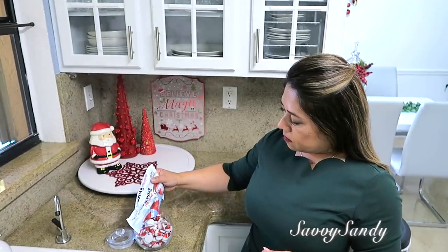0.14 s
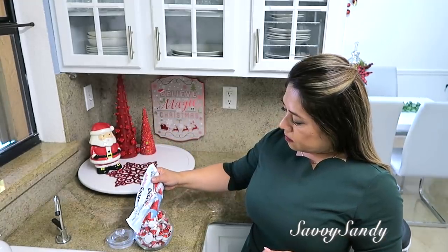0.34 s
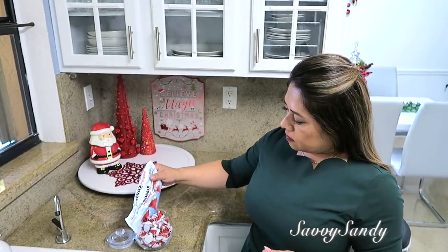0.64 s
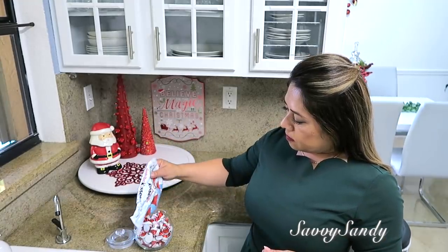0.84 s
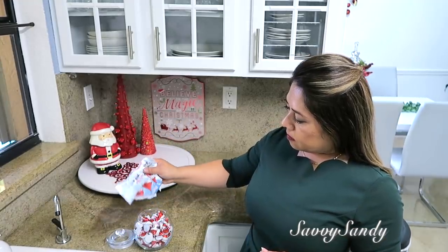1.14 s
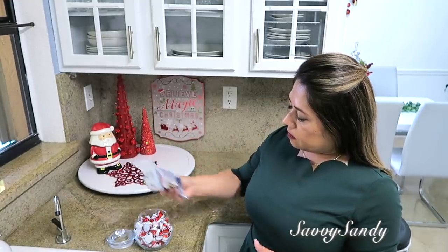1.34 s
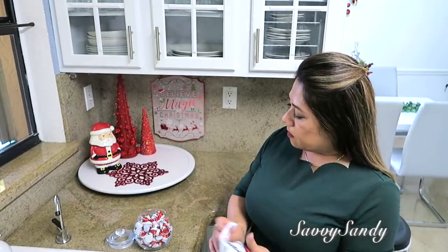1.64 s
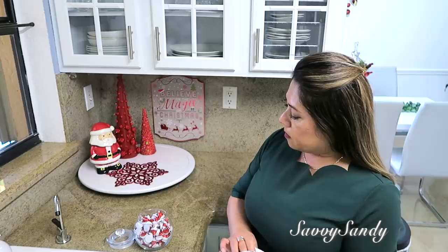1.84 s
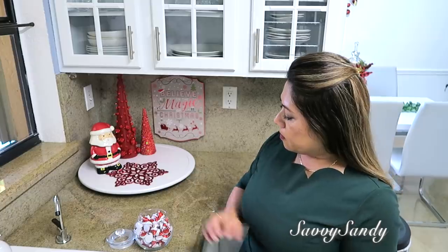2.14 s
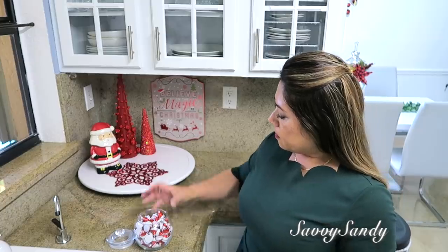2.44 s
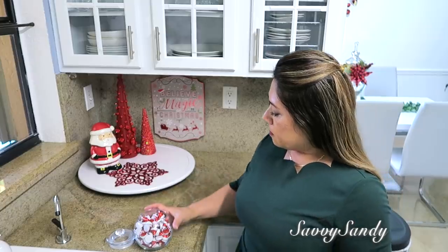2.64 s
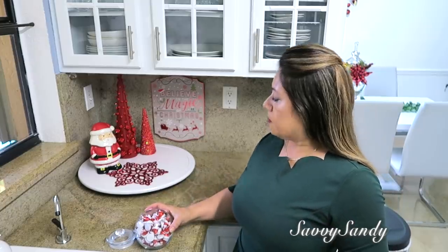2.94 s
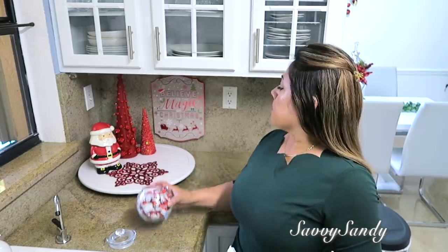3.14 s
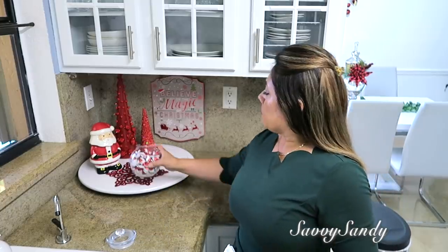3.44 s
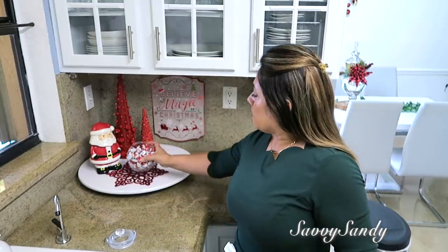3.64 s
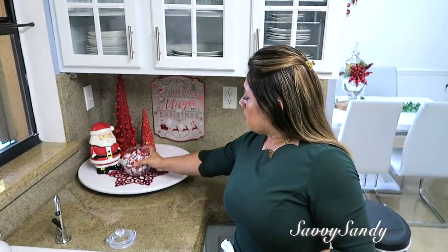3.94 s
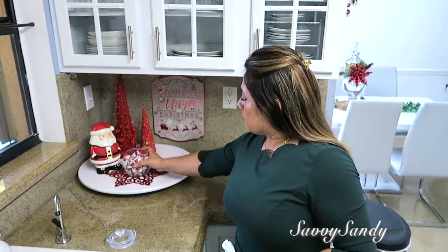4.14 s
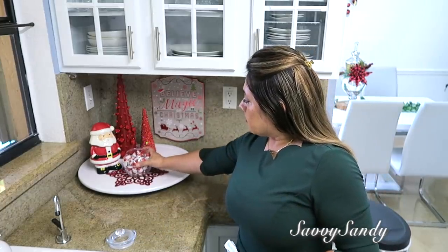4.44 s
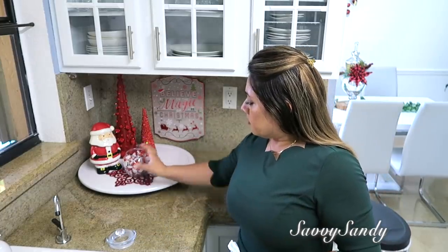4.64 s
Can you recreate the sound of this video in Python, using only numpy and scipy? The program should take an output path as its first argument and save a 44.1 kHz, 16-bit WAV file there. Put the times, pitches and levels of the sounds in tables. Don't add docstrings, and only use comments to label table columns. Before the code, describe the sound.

A reflective domestic kitchen, with a low, slightly wavering fridge hum and soft room air throughout. From the start, foil-wrapped candies tumble from a plastic bag into a glass jar: scattered snaps and faint rustling, with clear glass rings near 0.4 and 0.6 seconds and duller taps around 0.7. At about 0.9 to 1.1 the bag is shaken out in a tight cluster of cracks, then thins. From 1.5 to 2.5 the empty bag is crushed, the loudest and densest passage, with bright, sharp crackles. Between 2.6 and 3.1 fingers touch the jar and candies settle with small ticks, a damped bright glass tap near 2.8 and crisp clicks near 2.95. It goes mostly quiet, with slight taps around 3.7 to 3.9. At 4.16 to 4.19 the jar lands on a wooden tray in a quick, soft double knock. Light taps follow near 4.55 to 4.65. Close, wide stereo, treble-rich sound.

```python
import sys
import numpy as np
from scipy import signal
from scipy.fft import rfft, irfft, next_fast_len
from scipy.io import wavfile

SR = 44100
rng = np.random.default_rng(int(sys.argv[2]) if len(sys.argv) > 2 else 0)


def to_linear_factor(level_db):
    exponent = np.asarray(level_db, float) / 20
    return 10 ** exponent


def digitize_waveform(pressure):
    field = np.atleast_2d(pressure).T
    bounded = np.clip(field, -1, 1)
    quanta = np.round(bounded * 32767).astype(np.int16)
    wavfile.write(sys.argv[1], SR, quanta)


N = 211239


def evened(x):
    return x / np.sqrt(np.mean(x ** 2) + 1e-20)


def read(points, hz):
    f, value = np.transpose(points)
    return np.interp(np.log(hz + 1), np.log(f + 1), value)


def add(mix, s, sound):
    part = mix[round(s * SR):][:len(sound)]
    part += sound[:len(part)]


def colour(x, points):
    size = next_fast_len(N + 4096)
    gain = to_linear_factor(read(points, np.fft.rfftfreq(size, 1 / SR)))
    return irfft(rfft(x, size) * gain, size)[..., :N]


def wander(rate_hz):
    steps = np.arange(0, N + 64, 64)
    r = np.exp(-2 * np.pi * rate_hz * 64 / SR)
    drift = signal.lfilter([1], [1, -2 * r, r * r], rng.standard_normal(len(steps)))
    return np.interp(np.arange(N), steps, evened(drift))


def ring(hz, t60, t):
    return np.sin(2 * np.pi * hz * t) * to_linear_factor(-60 * t / t60)


def snaps():
    # start in seconds, peak in dB, centre in Hz, crispness in dB.
    pour = [(0.005, -28, 2180, -4), (0.028, -24, 2170, -20), (0.08, -45, 1210, -12),
            (0.161, -27.5, 1520, -8), (0.178, -31.5, 700, -3), (0.262, -35, 1900, 3.5),
            (0.269, -23, 1580, 1), (0.279, -36, 1120, -9), (0.305, -28, 1840, -17), (0.338, -31, 515, -30),
            (0.369, -18, 1320, -24), (0.573, -15.5, 2310, -20), (0.67, -23, 1480, -13),
            (0.703, -40, 1400, -15), (0.879, -30.5, 2460, -3), (0.899, -39, 1490, 3.5),
            (0.936, -23, 1570, -58), (0.964, -18, 1860, 0), (0.982, -14.5, 1750, -7), (0.99, -31, 470, -40),
            (1.008, -20.5, 2110, 1), (1.034, -20, 3020, -3.5), (1.075, -36, 2940, 5.5),
            (1.094, -31.5, 2220, 5), (1.123, -39, 1300, -15), (1.22, -29.5, 2000, 1),
            (1.327, -27.5, 1720, -9), (1.377, -36.5, 2520, -3), (1.419, -31, 2360, -7),
            (1.452, -26, 2300, -38)]
    crush = [(1.52, -39, 2070, 5.5), (1.551, -26, 3340, 4.5), (1.618, -27.5, 2300, -24),
             (1.672, -19, 2490, -16), (1.735, -22.5, 2610, -1), (1.74, -18.5, 2420, -13),
             (1.792, -19, 1700, -25), (1.803, -20.5, 1940, 2), (1.805, -26, 12500, -30),
             (1.813, -33, 1730, -10), (1.821, -23, 3200, -2), (1.837, -26, 2600, -14),
             (1.856, -22, 12800, -30), (1.861, -28, 2100, -10), (1.885, -11, 2580, -21),
             (1.903, -26, 2860, 7.5), (1.922, -15.5, 2130, -2), (1.953, -10.5, 2320, -28),
             (1.959, -28, 13000, -30), (1.975, -43, 2390, -18), (2.013, -22, 3160, 2.5),
             (2.044, -20, 3120, -10), (2.069, -23, 2790, -37), (2.075, -22.5, 460, -40),
             (2.097, -16.5, 2220, -3), (2.127, -19, 3600, -14), (2.128, -14.5, 11200, -11),
             (2.171, -15, 2220, -10), (2.183, -22.5, 1960, 5.5), (2.2, -17, 1670, -12),
             (2.204, -33, 540, -40), (2.211, -33, 1530, -3), (2.259, -17, 2730, -33),
             (2.266, -44, 11500, -28), (2.299, -34, 1730, 7.5), (2.343, -28, 2730, 4.5),
             (2.386, -33.5, 2950, 6.5), (2.348, -27.5, 5970, -25), (2.4, -23.5, 2800, -2.5),
             (2.423, -29, 3100, 5.5), (2.5, -45, 910, -18)]
    settle = [(2.641, -25, 2640, -15.5), (2.712, -30.5, 1950, -6), (2.712, -35, 9600, -28),
              (2.722, -34, 2920, -11), (2.793, -26, 1670, -26), (2.837, -25, 715, -43),
              (2.853, -35.5, 780, -45), (2.87, -37, 732, -40), (2.938, -25, 4630, -13),
              (2.941, -31, 6540, -6.5), (2.989, -35, 3036, 4.5), (3.024, -27.5, 1750, 4),
              (3.028, -32.5, 12100, -28), (3.044, -17.5, 3670, -35), (3.052, -25, 1660, -5),
              (3.065, -23, 1660, -3.5), (3.091, -36, 1850, 4), (3.118, -30, 1620, -15),
              (3.253, -54, 12900, -30), (3.34, -49.5, 2970, 3.5), (3.49, -55.5, 2950, 6.5),
              (3.55, -61, 2500, 9), (3.671, -33.5, 3800, -29), (3.775, -30.5, 1460, -1.5),
              (3.861, -32, 3230, -1), (3.985, -51, 9000, -22), (4.159, -43, 2370, -26),
              (4.163, -51, 12500, -30), (4.186, -51, 13100, -33.5), (4.186, -28.5, 2630, -36),
              (4.461, -56, 905, -8), (4.556, -34, 1590, -20), (4.569, -31, 1870, -27),
              (4.63, -27.5, 1370, -37)]
    # burst in seconds, bright edge in dB, edge in dB per dB of crispness,
    # build-up in seconds, first crack from 0 to 1.
    bursts = [
        (0.0085, -1.5, 5, 0.0037, 0.65),
        (0.0061, -4.5, 4, 0.0035, 0),
        (0.0048, -5, 4, 0.0015, 0),
    ]
    out, t = np.zeros(N), np.arange(2500) / SR
    for events, (burst, edge_db, slope, build, first) in zip([pour, crush, settle], bursts):
        for (s, db, hz, crisp_db), noise in zip(events, rng.standard_normal((len(events), 2502))):
            cracks = 0.094 * noise[2:] ** 3 * np.exp(-t / max(burst, .001))
            cracks *= 1 - np.exp(-t / max(build, .0002))
            cracks[0] = first
            thin = max(hz / 3000, 1)
            snap_hz = 3540.0 * np.exp(0.45 * np.tanh(noise[0]))
            edge_hz = 10600.0 * np.exp(0.031 * np.tanh(noise[1]))
            body = thin * ring(hz, 5 / hz, t)
            body += to_linear_factor(-24.5) / thin ** 2 * ring(687.0, 0.023, t)
            body += to_linear_factor(crisp_db + 8.5) * ring(snap_hz, 0.00062, t)
            body += to_linear_factor(slope * crisp_db + edge_db) * ring(edge_hz, 0.00021, t)
            add(out, s, to_linear_factor(db - 5.5) * signal.fftconvolve(cracks, body[:1000]))
    return out


def ticks():
    # start in seconds, peak in dB, centre in Hz.
    cracks = [(0.27, -25, 2960), (0.2825, -36, 2940), (0.574, -21, 9200), (0.8798, -32, 8100),
              (0.88, -33, 2050), (0.884, -35, 9500), (0.899, -31, 8000), (0.9035, -30, 10500),
              (0.936, -38, 1500), (0.9636, -15.5, 4700), (0.9638, -16, 13500), (0.968, -31, 9000),
              (1.555, -14.5, 6000), (1.806, -22, 9000), (1.824, -16, 4000), (1.892, -29, 4000),
              (1.905, -14, 8000), (2.129, -20, 8000), (2.136, -22, 9000), (2.204, -11, 4100),
              (2.267, -34, 9000), (2.263, -34, 4000), (2.302, -25, 5000), (2.337, -13.5, 3000),
              (2.35, -11.5, 5970), (2.401, -19, 5000), (2.426, -19.5, 5930), (2.712, -29.5, 6170),
              (2.9409, -15, 5960), (2.9465, -16, 6440), (3.0458, -26, 4000), (4.464, -46, 1200),
              (4.555, -44, 1893), (4.63, -41, 3180)]
    out, t = np.zeros(N), np.arange(200) / SR
    for s, db, hz in cracks:
        push_pull = np.diff(ring(hz, 7.4 / hz, t), prepend=0) * SR / (2 * np.pi * hz)
        add(out, s, to_linear_factor(db - 1.0) * push_pull)
    return out


def rustle():
    # time in seconds, effort in dB, tightness in dB.
    handling = [(0.0, -40, -9.5), (0.15, -46.5, 7), (0.67, -51, 8.5), (1.11, -48, 4), (1.37, -47.5, 4),
                (1.64, -48.5, 9), (1.8, -34, -11), (1.92, -40, 7), (2.07, -37, -4), (2.21, -37.5, 2),
                (2.32, -41.5, 6.5), (2.481, -38.5, 0), (2.56, -53, 13), (2.77, -52.5, 6.5),
                (2.97, -45.5, 8.5), (3.31, -56, 16), (4.62, -56, 9.5), (4.79, -64, 29)]
    # lowest and highest Hz, grain length in cycles, pops per second,
    # level in dB at full effort, dB per dB of effort, dB per dB of tightness.
    creases = [
        (412, 1366, 2.7, 840, -49, -0.16, -1.14),
        (1540, 4020, 1.47, 870, -45, 2, 0.),
        (4200, 16000, 2.06, 1800, -47, 2.5, 0.8261),
    ]
    full_db = -40
    now = np.arange(N) / SR
    s, effort_db, tight_db = np.transpose(handling)
    busy = np.clip(2.5 + (np.interp(now, s, effort_db) - full_db) / 2.5, .2, 1.3)
    drift, out = wander(8.8), np.zeros(N)
    clumps = to_linear_factor(3.2 * busy * drift)
    for low_hz, high_hz, cycles, per_s, db, follow, fine in creases:
        strength = to_linear_factor(2.17 * np.minimum(rng.exponential(1, N), 3.2))
        pops = strength * (rng.random(N) < per_s / SR)
        kind, layer = rng.integers(0, 10, N), np.zeros(N)
        for k, hz in enumerate(np.geomspace(low_hz, high_hz, 10)):
            turns = np.arange(0, 2 * cycles, hz / SR)
            swell = turns ** 2 * np.exp(-6. * turns / cycles)
            grain = np.sin(2 * np.pi * turns) * swell * np.sqrt(hz)
            spell = to_linear_factor(4 * np.roll(drift, round(hz * 17)))
            layer += signal.oaconvolve(pops * spell * (kind == k), grain)[:N]
        level_db = db + follow * (effort_db - full_db) + fine * tight_db
        out += evened(layer * clumps) * to_linear_factor(np.interp(now, s, level_db))
    return out


def wall_tilt(hz, low_db, upper_db, free):
    if hz < 2000:
        return to_linear_factor(low_db)
    if hz > 6000:
        return to_linear_factor(upper_db) * free
    return to_linear_factor(upper_db) if hz > 3000 else 1


def jar():
    # start in seconds, peak in dB,
    # low modes in dB, upper modes in dB, free ring from 0 to 1.
    taps = [
        (0.001, -39.5, -2, -24, 0.52),
        (0.368, -34, 7, -14, 1),
        (0.5735, -28, 7, -0.5, 1),
        (0.6693, -41, 18, -9, 0.5),
        (0.7044, -48, 30, -15, 0.07),
        (2.7935, -29, -9, 0.5, 0.14),
    ]
    mode_hz = [893, 858, 1250, 2298, 2310.3, 2313.5, 3350, 4205, 4192, 4230, 6440, 9055, 9600, 11720]
    # level in dB, t60 in seconds, sign (split pairs start opposed and swell).
    modes = [(-4, .16, 1), (-8, .22, 1), (3, .012, 1), (0, .9, 1), (0, .9, -1), (8, .17, 1), (5, .01, 1),
             (0, .7, 1), (0, .7, -1), (8, .04, 1), (-14, .25, 1), (-8, .06, 1), (-11, .07, 1),
             (-12, .07, 1)]
    aside_hz = [905, 2300, 2311, 2305, 2335, 4170, 4212, 4190, 6460]
    # level in dB, t60 in seconds.
    aside_modes = [(-5, 0.13), (2, 1.1), (-4, 1.2), (10, 0.17), (-12, 0.4), (3, 0.12), (-3, 0.55),
                   (7, 0.42), (-17, 0.6)]
    out, t = np.zeros((2, N)), np.arange(SR // 2) / SR
    lean = to_linear_factor(-6 / (1 + np.exp((.075 - t) / .006)))
    for s, db, low_db, upper_db, free in taps:
        free = max(free, 1 / 20)
        rise = to_linear_factor(db - 6.0) * (1 - np.exp(-t * np.sqrt(free) / 0.001))
        mid, side = np.zeros(len(t)), np.zeros(len(t))
        for hz, (d, t60, sign) in zip(mode_hz, modes):
            mid += sign * to_linear_factor(d) * wall_tilt(hz, low_db, upper_db, free) * ring(hz, free * t60, t)
        for hz, (d, t60) in zip(aside_hz, aside_modes):
            side += to_linear_factor(d) * wall_tilt(hz, low_db, upper_db, free) * ring(hz, free * t60, t)
        add(out[0], s, rise * lean * mid)
        add(out[1], s, rise * min(2 * free, 1) ** 2 * side)
    return out


def tray():
    # start in seconds, peak in dB.
    bumps = [
        (4.157, -27),
        (4.185, -21.5),
    ]
    # Hz, level in dB, t60 in seconds.
    wood = [(94, 4, .1), (212, -7, 0.08), (270, -5, 0.09), (378, -3, 0.07), (565, 0, 0.06), (760, -1, 0.04)]
    out, t = np.zeros(N), np.arange(SR // 4) / SR
    knock = ring(1100, .005, t) + .9 * ring(1500, .005, t)
    knock += .8 * ring(1900, .004, t) + .35 * ring(3000, .003, t)
    disc = sum(to_linear_factor(d) * ring(hz, t60, t) for hz, d, t60 in wood) + to_linear_factor(7.0) * knock
    for (s, db), noise in zip(bumps, rng.standard_normal((len(bumps), 3000))):
        chatter = 0.16 * noise * np.exp(-t[:3000] / 0.01)
        chatter[0] = .4
        contact = np.convolve(chatter, np.hanning(12) / 5)
        add(out, s, to_linear_factor(db - 18.5) * signal.fftconvolve(contact, disc))
    return out


def direct(x):
    early, late = np.roll(x, -2), np.roll(x, 2)
    return np.array([x, to_linear_factor(-5) * (early - late)])


def kitchen(x):
    # Hz, t60 in seconds.
    room = [(200, 0.095), (1000, 0.59), (3000, 0.53), (8000, 0.49), (15000, 0.25)]
    size, out = SR // 2, np.zeros((2, N))
    for turn in np.arange(3) * np.pi / 3:
        taps = np.zeros((4, size))
        at = np.arange(120, size - 20, 20) + rng.integers(0, 20, (4, (size - 121) // 20))
        np.put_along_axis(taps, at, rng.choice([-1., 1.], at.shape), 1)
        hz, t, z = signal.stft(taps[:2], SR, nperseg=256)
        dying = z * to_linear_factor(-60 * t / read(room, hz)[:, None])
        late = signal.istft(dying, SR, nperseg=256)[1][:, :size]
        early = taps[2:] * to_linear_factor(-60 * np.arange(size) / SR / .045)
        tail = to_linear_factor(-4) * early / np.linalg.norm(early, axis=1)[:, None]
        tail += to_linear_factor(-2.5) * late / np.linalg.norm(late, axis=1)[:, None]
        share = np.sqrt(2 / 3) * np.cos(2 * np.pi * 2 * np.arange(N) / SR + turn)
        out += signal.fftconvolve((x * share)[None], tail, axes=1)[:, :N]
    return out


def fridge():
    # Hz, level in dB rms.
    tones = [(59.2, -48.5), (118.6, -62), (236.9, -52.5), (296.1, -58), (355.3, -59), (414.5, -57),
             (506.0, -61), (592.2, -66.5), (672.9, -70)]
    # Hz, dB per Hz.
    hiss = [(12, -3), (59, -4), (161, -5.5), (416, -5.5), (1000, -22), (5850, -39), (11000, -43.5),
            (15500, -49)]
    t, hum = np.arange(N) / SR, np.zeros(N)
    for hz, db in list(tones) + [(13050, -86)]:
        level = to_linear_factor(db + 2. * wander(0.8)) * np.sqrt(2)
        hum += level * np.sin(2 * np.pi * (hz * t + rng.random()))
    air = colour(rng.standard_normal((2, N)), hiss)
    air *= to_linear_factor(-47.5 + 1.42 * wander(5.2)) / np.std(air[0])
    return air + hum * np.array([[1], [.5]])


def shiver():
    return to_linear_factor(3.5 * np.clip(wander(35), -3, 1))


def scene():
    # Hz, side minus mid in dB.
    width = [(60, -32), (130, -13.5), (290, -9.5), (640, -6.5), (1410, -1), (3100, 3.5), (6820, 3),
             (15000, 6)]
    handling = rustle() + snaps() + ticks() + tray()
    glass, aside = jar()
    mid, side = direct(handling) + kitchen(handling + to_linear_factor(-15) * glass) + fridge()
    mid = mid + glass * shiver()
    side = colour(side, width) + aside * shiver()
    return np.array([mid + side, mid - side])


def top_cut(x):
    return signal.sosfilt(signal.butter(12, 15800, fs=SR, output="sos"), x)


def record(dry):
    # Hz, dB.
    response = [(20, -7), (40, -9), (50, -0.5), (13300, 1.5), (13900, -16), (14400, -14), (15700, -6),
                (16200, -70)]
    heard = colour(.36 * np.tanh(dry / .36), response)
    offset = heard - heard.mean(1, keepdims=True) + .0004
    return top_cut(offset)


dry = scene()
out = record(dry)
digitize_waveform(out)
```